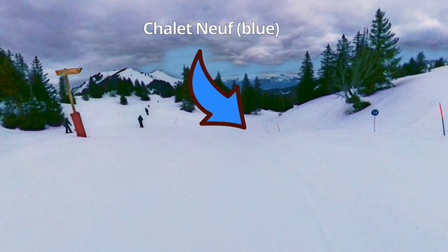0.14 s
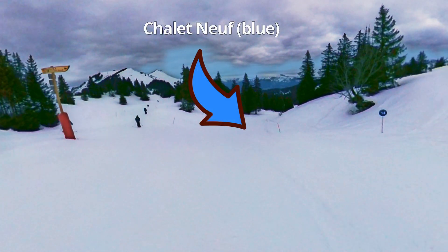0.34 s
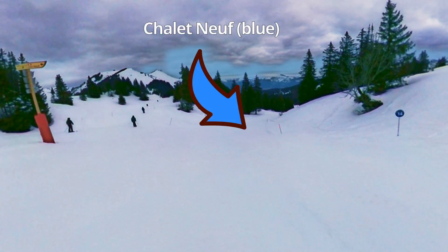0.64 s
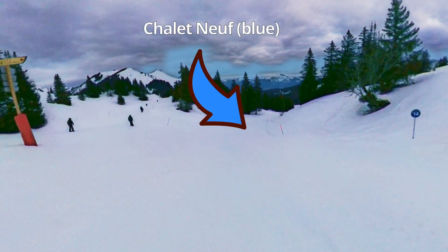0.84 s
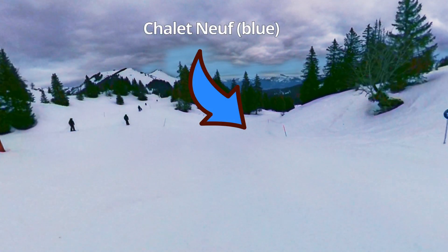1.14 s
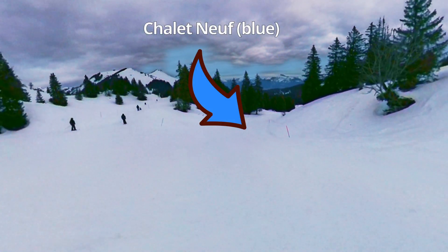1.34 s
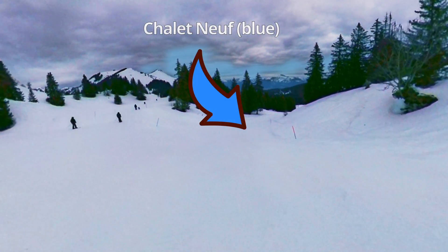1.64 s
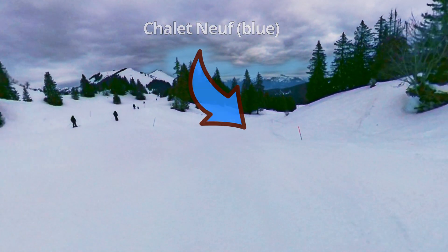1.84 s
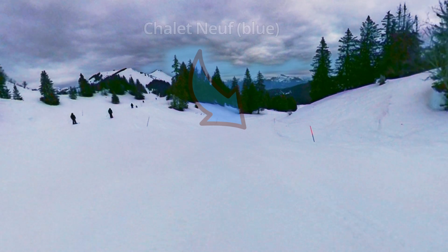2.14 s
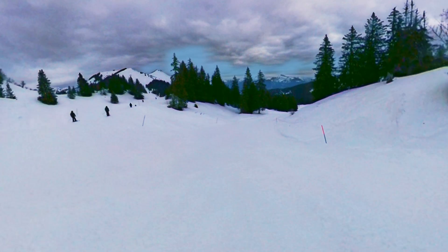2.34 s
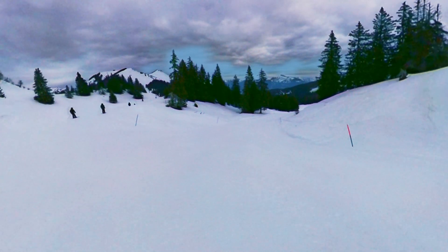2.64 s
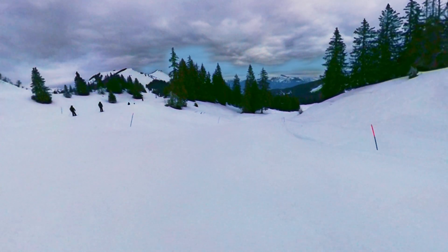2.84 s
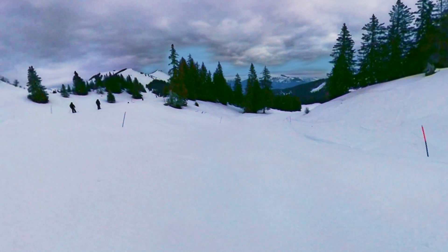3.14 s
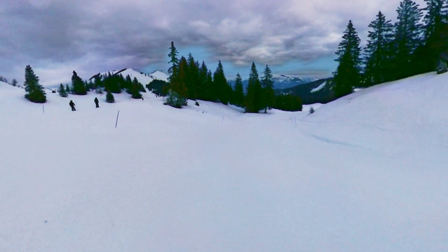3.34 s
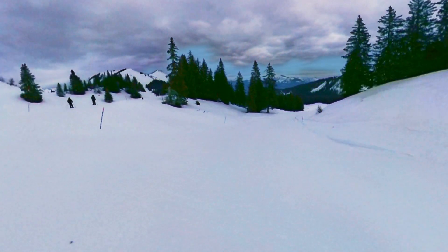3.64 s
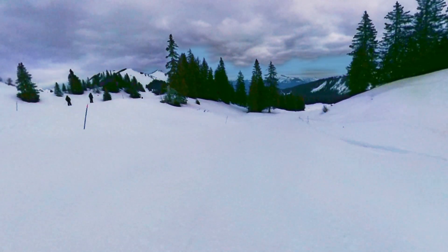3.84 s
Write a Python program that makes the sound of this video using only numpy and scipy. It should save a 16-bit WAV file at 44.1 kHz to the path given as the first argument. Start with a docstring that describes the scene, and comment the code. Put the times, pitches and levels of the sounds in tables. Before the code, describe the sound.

Ski skid on firm snow: soft rattling glide swells into rough, knocking scrape, then eases

```python
"""Skis in a long skidded turn

Skis run down a packed piste, gather speed and skid, heard by one close microphone.
Random snow lumps and listed knocks drive the skis' damped modes; coloured random clicks make the edge
scrape, the glide hiss and the short sprays of loose snow. Low filtered noise rumbles as wind on the
microphone, and filtered impulses give a few sharp ticks close by."""
import sys
import numpy as np
from scipy import signal
from scipy.fft import rfft, irfft
from scipy.io import wavfile

SR = 44100
rng = np.random.default_rng(int(sys.argv[2]) if len(sys.argv) > 2 else 0)


def transcribe(u):
    """Save the signal u as a 16-bit wav file named by the first command-line argument.

    u: samples, shape (n,) or (channels, n), limited to [-1, 1]; the rate is SR.
    q: integer samples, one column per channel.
    """
    v = np.clip(np.atleast_2d(u).T, -1, 1)
    q = np.round(v * 32767).astype(np.int16)
    wavfile.write(sys.argv[1], SR, q)


N = 176400  # samples, 4 s


def from_db(db):
    """Turn decibels into an amplitude gain."""
    return 10 ** (np.asarray(db) / 20)


def rms_one(x):
    """Scale to unit rms."""
    return x / np.sqrt(np.mean(x ** 2) + 1e-20)


def in_time(rows):
    """Draw straight lines between (time, value) rows, one value per sample."""
    times, values = np.transpose(rows)
    return np.interp(np.arange(N) / SR, times, values)


def coloured(x, spectrum):
    """Filter x by a gain curve drawn over log frequency; rms 1."""
    hz, db = np.transpose(spectrum)
    bins_hz = np.maximum(np.fft.rfftfreq(2 * N, 1 / SR), 1)
    gain = from_db(np.interp(np.log(bins_hz), np.log(hz), db))
    return rms_one(irfft(rfft(x, 2 * N) * gain)[:N])


def drift(hz):
    """Wander slowly at random: low-passed noise of rms 1, its extremes rounded."""
    r = np.exp(-2 * np.pi * hz / SR)
    noise = rng.standard_normal(N + SR)
    slow = rms_one(signal.lfilter([1], [1, -2 * r, r * r], noise)[SR:])  # skip the filter's start
    return rms_one(np.tanh(slow / 2))


def grains(per_s, spread_db):
    """Scatter random clicks of uneven size and sign; rms 1."""
    sizes = from_db(spread_db * np.minimum(rng.exponential(1, N), 4))
    signs = rng.choice([-1, 1], N)
    struck = rng.random(N) < per_s / SR
    return rms_one(sizes * signs * struck)


def resonance(x, hz, width_hz):
    """Ring at one pitch with gain 1 on top; a wider resonance dies sooner."""
    r = np.exp(-np.pi * width_hz / SR)
    zeros = np.array([1, 0, -1]) * (1 - r * r) / 2
    poles = [1, -2 * r * np.cos(2 * np.pi * hz / SR), r * r]
    return signal.lfilter(zeros, poles, x)


def add(out, s, sound):
    """Mix a short sound in at time s, in seconds."""
    i = max(int(s * SR), 0)
    out[i:i + len(sound)] += sound[:max(N - i, 0)]


# damped modes the skis ring with: pitch_hz [Hz], width_hz [Hz], level_db [dB, relative]
SKI_RESONANCES = [(271.3, 76, 0.5), (393.6, 56, 3), (453, 84, 0), (562.5, 46, 3), (643, 146, -3),
                  (814, 212, -3.5), (971, 515, -11)]


def ski(force):
    """Ring the skis' damped modes in parallel, with alternating signs."""
    out = 0
    for k, (hz, width_hz, db) in enumerate(SKI_RESONANCES):
        out = out + (-1) ** k * from_db(db) * resonance(force, hz, width_hz)
    return out


# how loud the snow drums on the skis, at the microphone: time_s [s], level_db [dB]
CHATTER_LEVEL = [(0, -49.5), (.38, -51.5), (.55, -52), (.66, -47.5), (.83, -46.5), (1.0, -47), (1.2, -46),
                 (1.45, -46.5), (1.53, -40.5), (1.62, -42.5), (1.75, -38.5), (1.83, -36), (1.875, -44.5),
                 (1.95, -35), (2.1, -32), (2.2, -31), (2.29, -28), (2.36, -26), (2.52, -27), (2.58, -22.5),
                 (2.65, -26), (2.72, -23), (2.78, -23), (2.88, -20), (3.05, -22.5), (3.14, -23),
                 (3.42, -27), (3.62, -36), (3.86, -36), (3.95, -31.5), (4, -35)]
# tone of the drummed skis, applied after their modes: pitch_hz [Hz], gain_db [dB, relative]
SKI_BODY_TONE = [(40, -29.5), (130, -5.5), (210, -1.5), (270, -1), (650, 2), (1000, -1), (1350, -4.5),
                 (2000, -12), (4000, -44.5), (16000, -86.5)]
LUMPS_PER_S, LUMP_SPREAD_DB = 1800, 1
BUMPS_PER_S, BUMPS_DB, BUMP_SPREAD_DB = 130, -9, .5  # level relative to the lumps
JUDDER_DB = 1.27  # per unit of judder


def chatter(judder):
    """Drum the skis' modes with fine lumps of snow and sparser bumps."""
    lumps = grains(LUMPS_PER_S, LUMP_SPREAD_DB)
    bumps = from_db(BUMPS_DB) * grains(BUMPS_PER_S, BUMP_SPREAD_DB)
    body = coloured(ski(lumps + bumps), SKI_BODY_TONE)
    return from_db(in_time(CHATTER_LEVEL)) * rms_one(body * from_db(JUDDER_DB * judder))


# the edges skidding sideways: time_s [s], level_db [dB], before judder
SKID_LEVEL = [(0, -89), (1.4, -74), (1.7, -70), (1.82, -60), (1.875, -66), (2.0, -51.5), (2.16, -51.5),
              (2.24, -47.5), (2.32, -43.5), (2.48, -40), (2.58, -36.5), (2.65, -38.5), (2.87, -35),
              (3.02, -34), (3.2, -38), (3.25, -42), (3.32, -41.5), (3.5, -49.5), (3.62, -55), (3.72, -54),
              (3.85, -57), (4, -51)]
# tone of the edges: pitch_hz [Hz], gain_db [dB, relative]
EDGE_TONE = [(100, -23), (600, -21), (1050, 4.5), (1400, -2), (1900, 1), (2150, -1), (2500, -5), (3200, -9),
             (3900, -15), (4400, -15.5), (5300, -25.5), (6400, -30), (6900, -36.5), (8000, -38.5),
             (12000, -54), (16000, -73.5)]
CRYSTALS_PER_S, CRYSTAL_SPREAD_DB = 9000, 0.5
CHIPS_PER_S, CHIPS_DB, CHIP_SPREAD_DB = 340, -13.5, 2  # level relative to the crystals
EDGE_JUDDER_DB = 0.88  # per unit of judder


def scrape(judder):
    """Shear off fine crystals and coarser chips at the edges, in step with the skis' judder."""
    crystals = grains(CRYSTALS_PER_S, CRYSTAL_SPREAD_DB)
    chips = from_db(CHIPS_DB) * grains(CHIPS_PER_S, CHIP_SPREAD_DB)
    level_db = in_time(SKID_LEVEL) + EDGE_JUDDER_DB * judder
    return from_db(level_db) * coloured(crystals + chips, EDGE_TONE)


# skis hitting bumps: start_s [s], thud_db [dB, envelope peak], pitch_hz [Hz], rise_s [s],
# ring_db [dB, peak], crunch_db [dB, before its envelope]
BUMP_HITS = [(.0238, -33, 283, 0.0022, -51, -51), (.0826, -28, 273, .0027, -33, -50),
             (.088, -39, 320, 0.0035, -46, -62), (.397, -42, 169, 0.0019, -53, -70),
             (.582, -40, 546, 0.0018, -51, -62), (1.076, -42, 300, .002, -35, -51),
             (1.113, -33.5, 312, 0.003, -44, -57), (1.158, -32.5, 262, 0.0029, -34, -53),
             (1.187, -41, 600, 0.0014, -42, -60), (1.221, -31.5, 420, 0.0017, -39, -60),
             (1.339, -36, 580, 0.0033, -40, -51), (1.529, -34, 383, 0.0022, -44, -60),
             (1.5866, -24, 265, .0026, -30, -49), (1.815, -28, 607, 0.0026, -34, -50),
             (1.8285, -41, 330, 0.0013, -25, -37.5), (1.899, -34, 570, 0.0013, -40, -53),
             (1.944, -32, 580, 0.0026, -50, -49), (2.150, -34, 400, 0.0038, -33, -36),
             (2.337, -16.5, 564, 0.007, -17.5, -43), (2.386, -13, 330, 0.0016, -26, -56),
             (2.452, -14, 530, 0.0016, -27, -42), (2.690, -12.5, 556, 0.0016, -23, -37),
             (2.708, -15, 533, 0.0076, -20.5, -25), (2.870, -18, 466, 0.0017, -16, -31.5),
             (3.214, -21, 542, 0.0032, -21.5, -42), (3.243, -22, 600, .002, -32, -47),
             (3.268, -17.5, 578, 0.0026, -20, -38), (3.298, -23, 414, 0.0022, -30, -36),
             (3.384, -28, 566, 0.0082, -37, -46), (3.694, -18.5, 782, .0017, -27.5, -36.5),
             (3.820, -22, 530, 0.0016, -25.5, -40), (3.9045, -24.5, 760, .0016, -25, -29),
             (3.968, -43, 550, 0.0034, -35, -31), (3.975, -19, 520, 0.0041, -25.5, -32),
             (3.990, -18.5, 560, 0.0032, -37, -50)]
# tone of the crushed snow: pitch_hz [Hz], gain_db [dB, relative]
CRUNCH_TONE = [(200, -11.5), (700, 10.5), (1300, 6), (2100, -4), (3000, -10), (4500, -19), (6500, -29),
               (9000, -42.5), (16000, -72)]
CRUNCH_S, CRUNCH_ATTACK_S = 0.0064, 0.0014  # time constants


def knocks():
    """Make each bump a decaying sine thud, a ring of the ski modes and a burst of crushed snow."""
    out = np.zeros(N)
    t = np.arange(SR // 10) / SR
    low_pass = signal.butter(4, 1200, fs=SR, output="sos")
    ringing = signal.sosfilt(low_pass, ski(signal.unit_impulse(len(t))))
    ringing = ringing / np.abs(ringing).max()
    snow = coloured(rng.standard_normal(N), CRUNCH_TONE)
    crunch_envelope = np.exp(-t / CRUNCH_S) * (1 - np.exp(-t / CRUNCH_ATTACK_S))
    for k, (s, thud_db, hz, rise_s, ring_db, crunch_db) in enumerate(BUMP_HITS):
        push = (t / rise_s * np.exp(1 - t / rise_s)) ** 2  # reaches 1 at rise_s
        thud = push * np.sin(2 * np.pi * hz * t)
        crunch = snow[k * len(t):(k + 1) * len(t)] * crunch_envelope  # fresh noise each time
        add(out, s, from_db(thud_db) * thud)
        add(out, s, from_db(ring_db) * ringing + from_db(crunch_db) * crunch)
    return out


# puffs of loose snow: start_s [s], length_s [s, before the release], level_db [dB, before flutter]
SPRAY_PUFFS = [(0.049, .11, -78), (0.273, .08, -75.5), (.42, .08, -76.5), (0.538, .06, -78),
               (0.6, 0.022, -70.5), (0.626, 0.0092, -70), (0.727, .05, -76), (.85, .03, -78),
               (.94, .06, -78), (1.022, .02, -76), (1.083, .025, -71.5), (1.297, .08, -81),
               (1.452, .045, -74), (1.64, .05, -79), (1.878, .02, -75), (2.023, .045, -70),
               (3.467, .07, -70), (3.645, .065, -68.5), (3.717, .07, -66), (3.911, .065, -63)]
# tone of the loose snow: pitch_hz [Hz], gain_db [dB, relative]
SPRAY_TONE = [(500, -11), (3000, 3.5), (5000, 3), (8000, -3), (11000, -9), (13000, -13), (16000, -20)]
SPRAY_GRAINS_PER_S, SPRAY_FLUTTER_DB, SPRAY_FLUTTER_HZ = 4600, 1.5, 45
SPRAY_ATTACK_S, SPRAY_RELEASE_S = 0.0078, 0.0075  # straight rise, exponential fall


def sprays():
    """Throw puffs of fine snow grains that start quickly, flutter and stop."""
    t = np.arange(N) / SR
    level = np.zeros(N)
    for s, length_s, db in SPRAY_PUFFS:
        rise = np.clip((t - s) / SPRAY_ATTACK_S, 0, 1)
        fall = np.exp(-np.maximum(t - s - length_s, 0) / SPRAY_RELEASE_S)
        level += from_db(db) * rise * fall
    flutter = from_db(SPRAY_FLUTTER_DB * drift(SPRAY_FLUTTER_HZ))
    return level * flutter * coloured(grains(SPRAY_GRAINS_PER_S, spread_db=2.5), SPRAY_TONE)


# hard contacts close to the microphone: start_s [s], peak_db [dB], pitch_hz [Hz],
# width_hz [Hz, each of two resonances], top_hz [Hz, low-pass]
CLOSE_TICKS = [(0.8254, -37, 1900, 3600, 6450), (0.824, -50, 2930, 900, 6000),
               (1.246, -40, 2000, 2200, 6500), (1.271, -46.5, 3000, 3000, 6500),
               (1.371, -50, 2950, 1300, 6500), (1.5875, -52, 3020, 600, 6500),
               (3.5606, -27, 1750, 3880, 7200), (3.670, -41, 4080, 600, 6500)]


def ticks():
    """Ring tiny hard contacts: a low-passed impulse through the same resonance twice."""
    out = np.zeros(N)
    for s, db, hz, width_hz, top_hz in CLOSE_TICKS:
        low_pass = signal.butter(8, min(top_hz, SR / 3), fs=SR, output="sos")
        click = signal.sosfilt(low_pass, signal.unit_impulse(SR // 20))
        tick = resonance(resonance(click, hz, width_hz), hz, width_hz)
        add(out, s, from_db(db) * tick / np.abs(tick).max())
    return out


# tone of the ski bases on snow: pitch_hz [Hz], gain_db [dB, relative]
GLIDE_TONE = [(100, -13.5), (400, -4), (750, 10.5), (1000, 10), (1400, -1.5), (1900, -0.5), (2700, -6),
              (3300, -11.5), (4300, -17), (5300, -21.5), (7000, -26), (10000, -31.5), (16000, -40)]
GLIDE_DB, GLIDE_FOLLOWS_WIND = -55.5, 0.21  # level at mean wind level; share of the wind's dB swing


def glide(wind_db, judder):
    """Hiss softly as the bases run over fine crystals, louder when the wind of speed is louder."""
    wind_swing_db = wind_db - wind_db.mean()
    level_db = GLIDE_DB + GLIDE_FOLLOWS_WIND * wind_swing_db + EDGE_JUDDER_DB * judder
    return from_db(level_db) * coloured(grains(CRYSTALS_PER_S, CRYSTAL_SPREAD_DB), GLIDE_TONE)


# wind on the microphone: time_s [s], level_db [dB, before buffeting]
WIND_LEVEL = [(0, -55.5), (.3, -60), (.85, -56), (1.0, -55), (1.3, -51.5), (1.75, -45.5), (2.2, -39),
              (2.85, -44.5), (3.35, -41), (3.5, -36), (3.62, -38), (4, -37)]
# tone of the wind: pitch_hz [Hz], gain_db [dB, relative]
WIND_TONE = [(20, -29), (45, -9.5), (70, -3.5), (110, 2), (160, 0), (230, -9), (400, -38), (1000, -44),
             (16000, -86)]
BUFFET_DB, BUFFET_HZ = 1, 9.2


def wind(wind_db):
    """Rumble low and lumpy on the microphone port: coloured noise with a buffeted level."""
    level_db = wind_db + BUFFET_DB * drift(BUFFET_HZ)
    return from_db(level_db) * coloured(rng.standard_normal(N), WIND_TONE)


JUDDER_HZ = 23.9
JUDDER_SLOW_SHARE, JUDDER_SLOW_HZ = 0.6, 7.1  # uneven pressure on the edges


def scene():
    """Mix skis, snow and wind at one close microphone; one judder sways chatter, scrape and glide."""
    judder = drift(JUDDER_HZ) + JUDDER_SLOW_SHARE * drift(JUDDER_SLOW_HZ)
    wind_db = in_time(WIND_LEVEL)
    skis = chatter(judder) + scrape(judder) + knocks()
    snow = sprays() + glide(wind_db, judder)
    return (skis + snow + ticks() + wind(wind_db))[None]


CUTOFF_HZ = 15750


def record(dry):
    """Cut the top steeply with an elliptic low-pass."""
    low_pass = signal.ellip(10, .1, 80, CUTOFF_HZ, fs=SR, output="sos")
    return signal.sosfilt(low_pass, dry)


dry = scene()
out = record(dry)
transcribe(out)
```